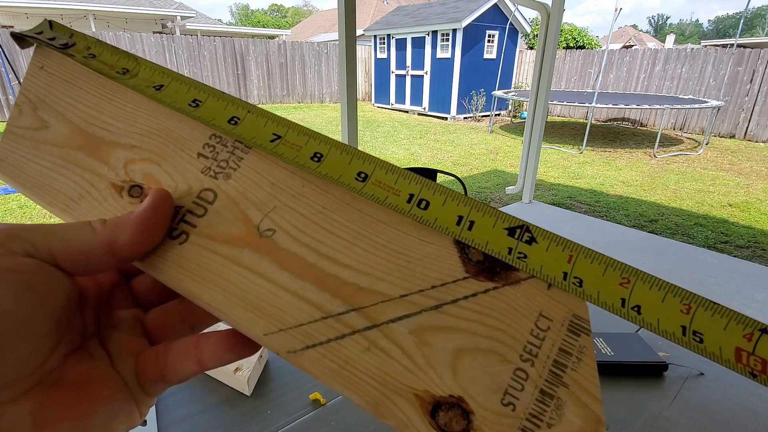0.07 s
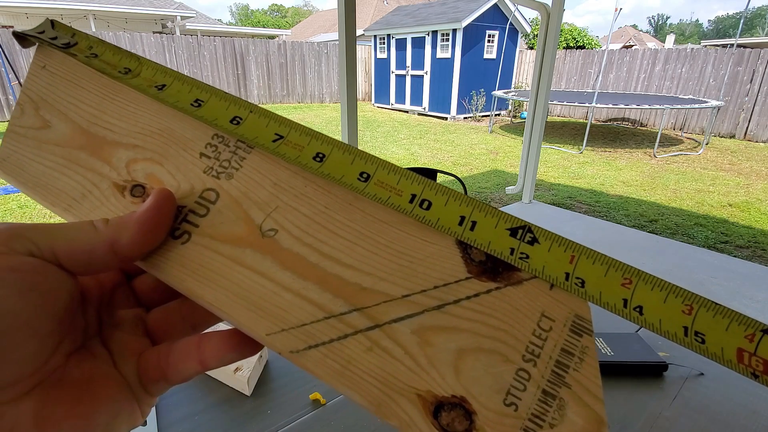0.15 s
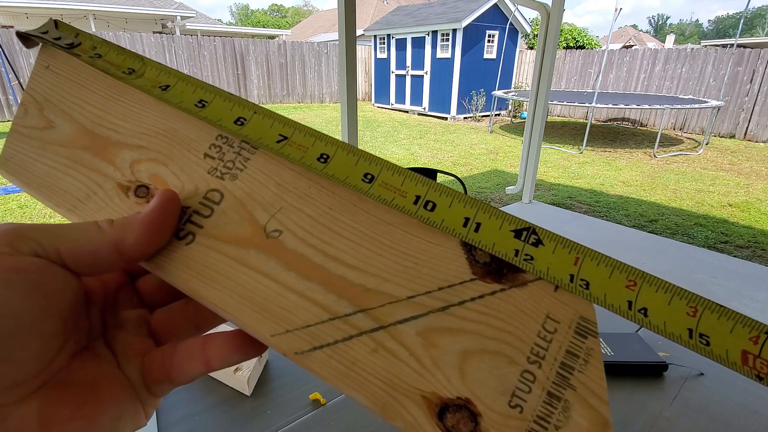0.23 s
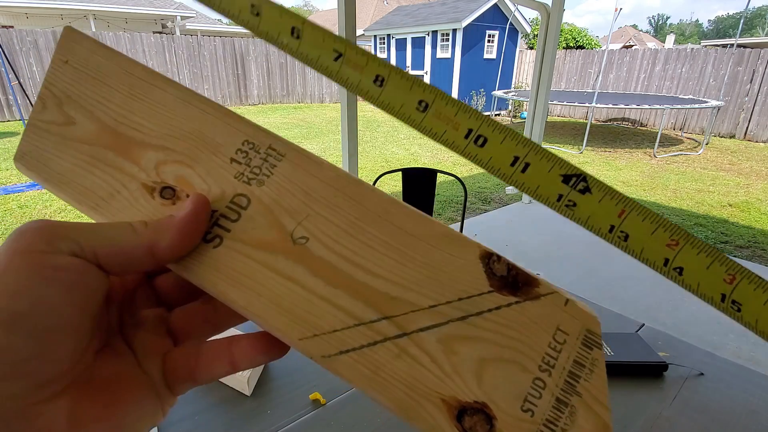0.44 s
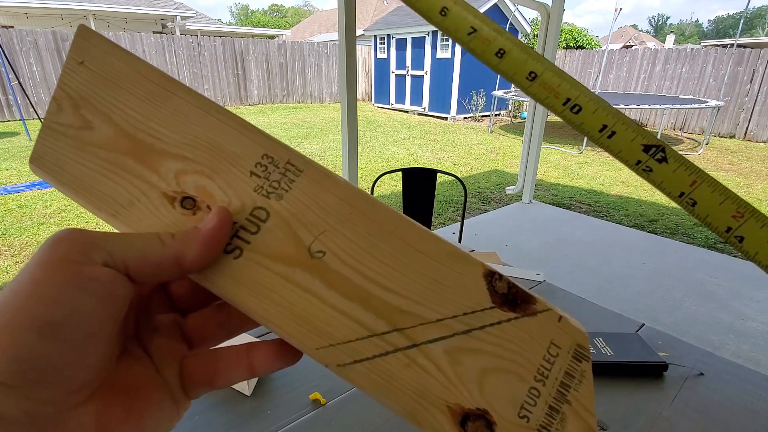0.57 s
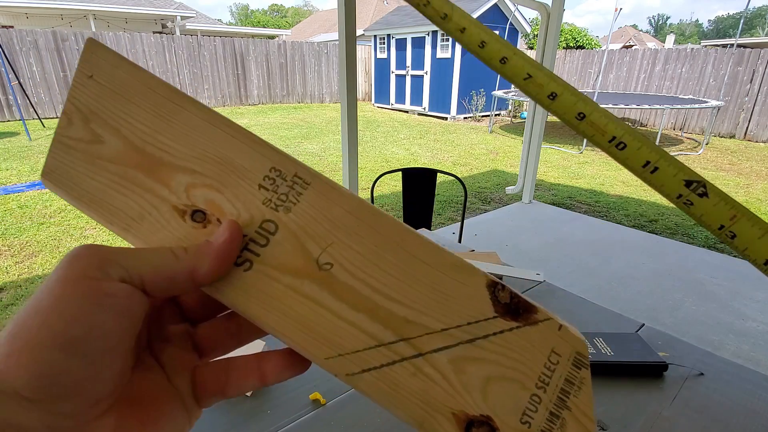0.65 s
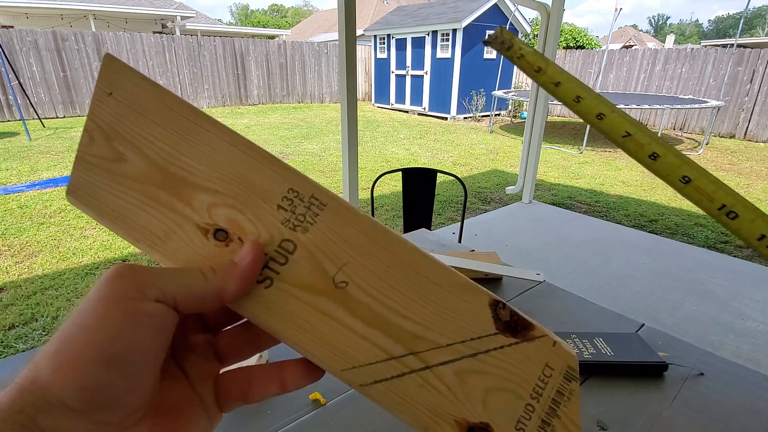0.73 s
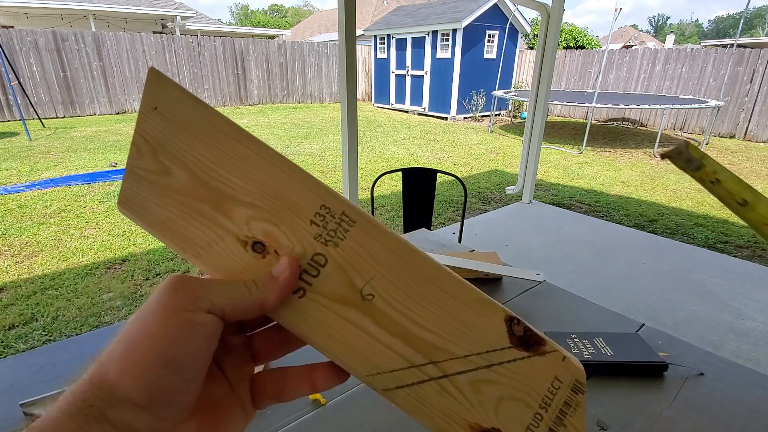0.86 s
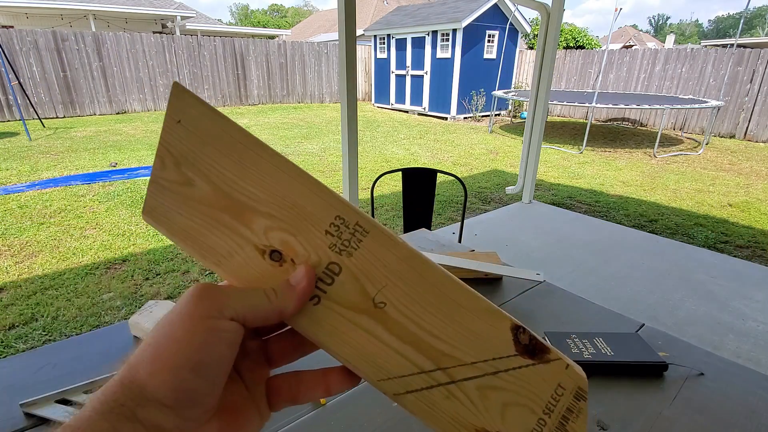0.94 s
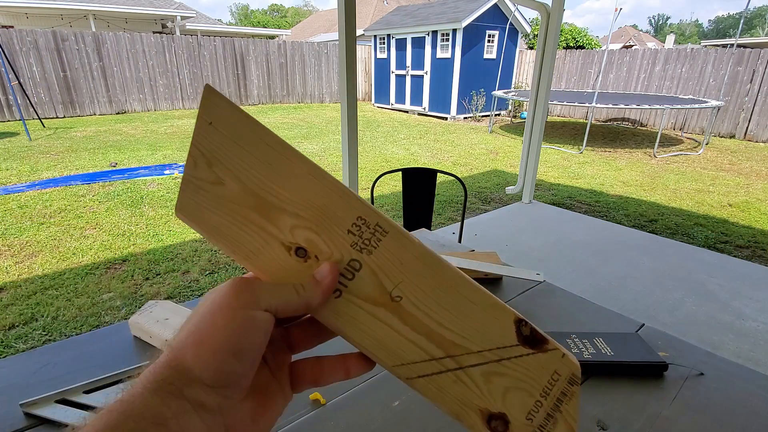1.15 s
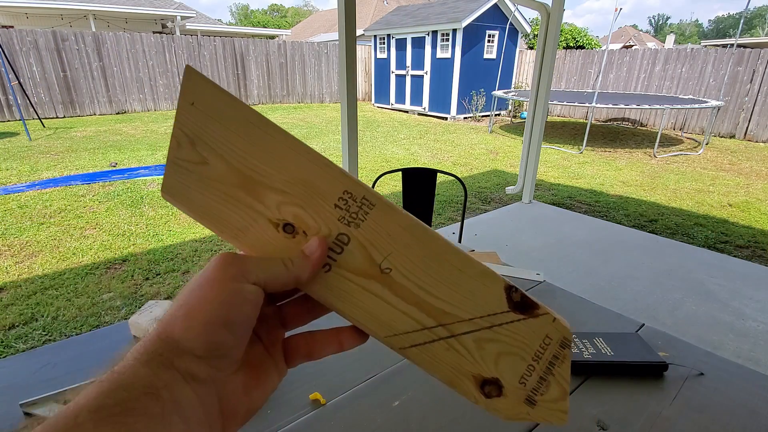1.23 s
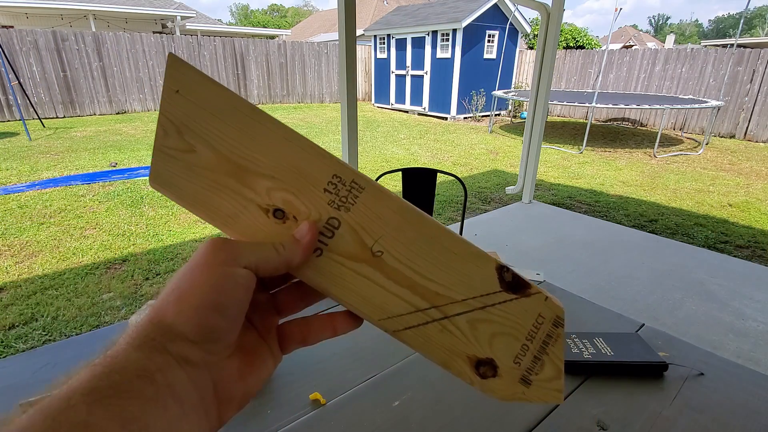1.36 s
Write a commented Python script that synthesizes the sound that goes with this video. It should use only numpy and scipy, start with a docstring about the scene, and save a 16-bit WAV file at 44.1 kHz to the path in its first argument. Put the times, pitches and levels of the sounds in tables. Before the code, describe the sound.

Retracting metal tape blade clicks, hisses faster, and snaps hard into its plastic case outdoors

```python
"""Retracting steel tape measure

A steel tape is unhooked from a board and runs back into its plastic case, close by on a roofed patio.
Friction noise and a case resonance make the blade's hiss; noise bursts through blade resonances tick.
Bursts through case resonances give the spool's knocks and the hook's slam, with a thud and a crack.
Decaying noise forms the brief patio echo; shaped noise forms the outdoor rumble and faint hiss.
A swept tone makes one far bird chirp near the start."""
import sys
import numpy as np
from scipy import signal
from scipy.fft import rfft, irfft, next_fast_len
from scipy.io import wavfile
from scipy.ndimage import uniform_filter1d, map_coordinates

SR = 44100
rng = np.random.default_rng(int(sys.argv[2]) if len(sys.argv) > 2 else 0)


def log_audio(samples):
    """Write samples as a 16-bit WAV file to the path given in sys.argv[1]."""
    # one column per channel
    frames = np.atleast_2d(samples).T
    # limit to full scale, then quantise
    limited = np.clip(frames, -1, 1)
    pcm = np.round(limited * 32767).astype(np.int16)
    wavfile.write(sys.argv[1], SR, pcm)


N = 61739

# Outdoor rumble over time [t/s, level/dB]
RUMBLE_LEVELS = [(0, -39.5), (.12, -34), (.21, -36), (.31, -31.5), (.45, -29.5), (.6, -31.5), (.78, -32),
                 (1.09, -32.5), (1.14, -42), (1.2, -36), (1.24, -38), (1.3, -42.5), (1.4, -45.5)]
# Relative rumble spectrum [f/Hz, level/dB]
RUMBLE_SPECTRUM = [(20, -42), (33, -8), (48, -2), (65, -1), (120, -5), (200, -14), (260, -11), (400, -18),
                   (630, -29), (1200, -59.5), ]
# Left-right correlation of the rumble [f/Hz, correlation/1]
RUMBLE_CORRELATION = [(40, 0.99), (130, 0.97), (290, 0.94), (800, .2)]
# Relative spectrum of the faint steady hiss [f/Hz, level/dB]
AIR_SPECTRUM = [(600, -4.5), (900, -5), (1800, -6.5), (2600, -10), (3800, -18), (8000, -22), (9500, -48),
                (11000, -28.5), (15700, -29)]
# Blade sliding through the mouth [t/s, level/dB, left-right difference/dB, resonance over hiss/dB]
SLIDE_MOTION = [(.33, -89, 8, -26), (.39, -45, 3, -20), (.425, -45, 4.5, -20), (.5, -52, -3.5, -26),
                (.6, -40, -1, -14), (.69, -40, -0.5, -10.5), (.72, -35.5, -4, -12.5),
                (.79, -32.5, -5.5, -12), (.84, -28, -8.5, -11.5), (1.0, -29.5, -8, -9.5),
                (1.11, -27, -8, -9.5), (1.142, -25, -2.5, -15), (1.165, -27, 1, -20), (1.176, -30, -6, -13),
                (1.197, -29.5, -2, -13), (1.205, -57, 2, -20)]
# Relative spectrum of the sliding hiss [f/Hz, level/dB]
HISS_SPECTRUM = [(290, -52), (500, -20), (771, -10.5), (1210, -17), (1970, -10.5), (3600, -11.5),
                 (7310, -5.5), (9340, -10.5), (11300, -4.5), (15700, -6.5)]
# Pitch of the case resonance [t/s, f/Hz]
MOUTH_PITCH = [(.93, 1850), (1.03, 2000), (1.12, 2248)]
# Delay of the left port behind the right [t/s, lag/ms]
LEFT_LAG = [(.4, -0.41), (.56, 0), (.72, 0.484)]
# Blows on the case [t/s, peak level of each path/dB, left-right difference/dB, colour centre f/Hz,
#                    colour width/Hz, decay constant of the burst/s]
CASE_BLOWS = [(.4327, -14.5, -0.5, 1760, 1400, 0.0053), (0.4336, -23.5, 3.5, 1045, 202, 0.0018),
              (0.733, -30.5, -10, 453, 600, 0.0066), (0.7948, -16.5, -4.5, 1852, 300, 0.0028),
              (0.7949, -26, -14, 5030, 1200, 0.0004), (0.911, -22.5, -3, 1740, 900, 0.0043),
              (0.919, -22.5, -11, 1985, 500, 0.0025), (.983, -19.5, -7, 1910, 450, 0.0025),
              (.984, -33, -8, 838, 300, 0.0011), (1.1992, -3.5, 7, 3020, 1200, 0.0016),
              (1.2044, 1, -4, 3720, 7200, 0.0038), (1.208, -11.5, 4, 2240, 1300, 0.014)]
# Case resonances [f/Hz, width/Hz, level/dB]
CASE_MODES = [(398, 196, 6), (786, 120, 2), (1032, 88, -4), (1370, 276, -4.5), (1894, 250, -2),
              (2188, 285, -4), (3070, 1020, -5), (4510, 410, -2), (5760, 420, -3), (6910, 540, 1.5),
              (7430, 3100, -7)]
# Blade against mouth and board [t/s, peak level of each path/dB, t60 of the burst/s, colour centre f/Hz]
BLADE_TICKS = [(0.4346, -12.5, 0.023, 7400), (0.4364, -10, 0.031, 11300), (0.4439, -13, 0.032, 7000),
               (0.4526, -19, 0.022, 7900), (0.4695, -35, 0.015, 8500), (0.4849, -21, 0.023, 12400),
               (0.5652, -17, 0.039, 7000), (.592, -29.5, 0.028, 8400), (0.6437, -36, 0.046, 13000),
               (1.1133, -14, 0.037, 9100), (1.1206, -7, 0.057, 7100), (1.147, -7.5, 0.032, 5330)]
# Blade resonances [f/Hz, width/Hz, level/dB]
BLADE_MODES = [(1745, 540, 0.5), (4190, 1500, -4), (7060, 610, -1), (7850, 450, -0.5), (11160, 3700, -4),
               (15300, 2600, -8.5)]
# Reverberation time of roof and slab [f/Hz, t60/s]
PATIO_T60 = [(700, 0.35), (2500, 0.41), (6000, 0.28), (14000, 0.26)]

RUMBLE_LEAD_MS, AIR_DB = 0.28, -53.5  # the rumble reaches the left port first
CHIRP_S, CHIRP_LENGTH_S, CHIRP_DB = 0.08, 0.033, -58.5
CHIRP_HZ, CHIRP_FALL_HZ = 2570, 97.3  # centre pitch; fall in each CHIRP_LENGTH_S
GRIT_DB, PATCHY_DB = 2, 1.5  # fast unevenness of the scrape; its patchy colour
MOUTH_WIDTH_HZ = 780
MOUTH_PAN = 0.067  # share of the hiss's left-right swing
SHARED_POWER = 0.25  # power share of the path common to both ports
THUD_HZ, THUD_DB, THUD_DECAY_S = 473, -20.5, 0.0038
CRACK_DB, CRACK_DECAY_S = -6, 0.0035
PATIO_DB, PATIO_DELAY_S = -12.5, 0.006
CLIP_TOP, CLIP_HARD = 0.74, 6  # ceiling in full scale; sharpness of the knee
EDGE_HZ, EDGE_DB, TOP_HZ = 15750, -32, 16950  # weak band from edge to top


def amp(db):
    """A level in decibels defines an amplitude ratio."""
    return 10 ** (np.asarray(db) / 20)


def unit(x):
    """Division by the root mean square leaves unit rms."""
    return x / np.sqrt(np.mean(x ** 2) + 1e-20)


def along(points, hz):
    """A spectrum is interpolated on a logarithmic frequency axis."""
    f, value = np.transpose(points)
    return np.interp(np.log(hz + 1), np.log(f + 1), value)


def curves(rows):
    """Linear interpolation gives each column after the time one value per sample."""
    s, *columns = np.transpose(rows)
    return [np.interp(np.arange(N) / SR, s, column) for column in columns]


def wobble(rate):
    """Spline interpolation of random knots, rate per second, gives a smooth fluctuation."""
    knots = rng.standard_normal(int(N * rate / SR) + 4)
    return map_coordinates(knots, [np.arange(N) * rate / SR])


def filtered(x, response):
    """A linear filter multiplies the spectrum by its frequency response."""
    n = x.shape[-1]
    padded = next_fast_len(n + 4096)
    spectrum = rfft(x, padded) * response(np.fft.rfftfreq(padded, 1 / SR))
    return irfft(spectrum, padded)[..., :n]


def ringing(modes):
    """Modal superposition: a body responds as a sum of damped resonances, here of alternating sign."""
    def response(f):
        total = 0
        for k, (centre, width, db) in enumerate(modes):
            damping = 1j * f * width
            total = total + (-1) ** k * amp(db) * damping / (centre * centre - f * f + damping)
        return total
    return response


def rush(spectrum, correlation):
    """Independent mid and side noises set the interaural correlation by their power ratio."""
    def mid_side(hz):
        angle = np.arccos(np.clip(along(correlation, hz), -1, 1)) / 2
        return amp(along(spectrum, hz)) * np.array([np.cos(angle), np.sin(angle)])
    mid, side = filtered(rng.standard_normal((2, N)), mid_side)
    return unit(np.array([mid + side, mid - side]))


def panned(pair, pan_db):
    """Intensity panning: the left-right level difference is split evenly between the ports."""
    return pair * amp(np.array([pan_db, -pan_db]) / 2)


def blended(shared, own):
    """Incoherent addition: power shares weight the common path and each port's own path."""
    return np.sqrt(SHARED_POWER) * shared + np.sqrt(1 - SHARED_POWER) * own


def heard(trio):
    """Time-of-arrival difference: the shared path reaches the nearer port first."""
    half_lag = curves(LEFT_LAG)[0] * SR / 2000  # ms to half the lag in samples
    n = np.arange(N)
    shared = [map_coordinates(trio[0], [n + side * half_lag]) for side in (-1, 1)]
    return blended(np.array(shared), trio[1:])


def one(s, burst, db, pan_db):
    """Time-of-arrival difference for a single impact, with its lag fixed at the moment of the hit."""
    trio = np.zeros((3, N))
    at = round(s * SR)
    peak = np.abs(burst).max(1, keepdims=True)
    trio[:, at:at + burst.shape[1]] = amp(db) * burst / peak
    half_lag = np.interp(s, *np.transpose(LEFT_LAG)) * SR / 2000
    shared = [np.roll(trio[0], round(side * half_lag)) for side in (1, -1)]
    return panned(blended(np.array(shared), trio[1:]), np.array([pan_db]))


def rumble():
    """Band-shaped random noise with a fluctuating level forms a lumpy far rumble, left first."""
    level_db = curves(RUMBLE_LEVELS)[0] + 1.98 * wobble(15.66)
    pair = amp(level_db) * rush(RUMBLE_SPECTRUM, RUMBLE_CORRELATION)
    pair[1] = np.roll(pair[1], round(RUMBLE_LEAD_MS * SR / 1000))
    return pair


def air():
    """Stationary noise, nearly uncorrelated between the ports, forms the faint hiss."""
    return amp(AIR_DB) * rush(AIR_SPECTRUM, [(1000, 0.061), (8000, 0.05)])


def chirp():
    """Frequency modulation: a bird's tone falls in pitch under a Gaussian envelope."""
    u = (np.arange(N) / SR - CHIRP_S) / CHIRP_LENGTH_S
    phase = 2 * np.pi * np.cumsum(CHIRP_HZ - CHIRP_FALL_HZ * u) / SR
    return amp(CHIRP_DB) * np.exp(-u ** 2) * np.sin(phase)


def patchy(x):
    """Short-time spectral gain: random patches of time and frequency shift the scrape's colour."""
    z = signal.stft(x, nperseg=256)[2]
    field = rng.standard_normal(z.shape[1:])
    field = uniform_filter1d(field, size=8, axis=0)
    field = uniform_filter1d(field, size=6, axis=1)
    return signal.istft(z * amp(PATCHY_DB * unit(field)), nperseg=256)[1][:, :N]


def mouth_resonance(excess_db):
    """Amplitude modulation of a carrier by slow noise gives a resonance that climbs as the spool fills."""
    noise = rng.standard_normal((2, 3, N))
    slow = unit(filtered(noise, lambda hz: 1 / (1 + (2 * hz / MOUTH_WIDTH_HZ) ** 2)))
    phase = 2 * np.pi * np.cumsum(curves(MOUTH_PITCH)[0]) / SR
    carrier = slow[0] * np.cos(phase) + slow[1] * np.sin(phase)
    return carrier * amp(excess_db + 1.9 * wobble(51.4))


def slide():
    """Friction: the gritty blade radiates broadband noise and excites the case resonance."""
    level_db, pan_db, mouth_db = curves(SLIDE_MOTION)
    grit = amp(GRIT_DB * wobble(400) + 1.2 * wobble(40)) * rng.standard_normal((3, N))
    hiss = unit(filtered(patchy(grit), lambda hz: amp(along(HISS_SPECTRUM, hz))))
    mouth = mouth_resonance(mouth_db)
    return amp(level_db) * (panned(heard(hiss), pan_db) + panned(heard(mouth), MOUTH_PAN * pan_db))


def blows():
    """Impact excitation: short coloured pushes set the modes of the case ringing."""
    t = np.arange(SR // 12) / SR
    out = np.zeros((2, N))
    for s, db, pan_db, hz, width_hz, decay_s in CASE_BLOWS:
        push = np.exp(-t / decay_s) * rng.standard_normal((3, len(t)))
        push[:, 0] = 5  # sharp first contact
        colour, case = ringing([(hz, width_hz, 0)]), ringing(CASE_MODES)
        out += one(s, filtered(push, lambda f: colour(f) ** 2 * case(f)), db, pan_db)
    return out


def slam():
    """Impact of the hook: the whole case jumps as a damped sine and the blade rattles in its modes."""
    t = np.arange(SR // 12) / SR
    out = np.zeros((2, N))
    for s, *_ in CASE_BLOWS[-3:-1]:
        at = round(s * SR)
        thud = amp(THUD_DB) * np.exp(-t / THUD_DECAY_S) * np.sin(2 * np.pi * THUD_HZ * t)
        out[:, at:at + len(t)] += thud
        rattle = np.exp(-t / CRACK_DECAY_S) * rng.standard_normal((3, len(t)))
        out += one(s, filtered(rattle, ringing(BLADE_MODES)), CRACK_DB, 0)
    return out


def ticks():
    """Impact excitation: dying noise bursts ring the blade's modes, panned to where the blade slides."""
    t = np.arange(SR // 12) / SR
    pan_db = curves(SLIDE_MOTION)[1]
    out = np.zeros((2, N))
    for s, db, t60, hz in BLADE_TICKS:
        burst = amp(-60 * t / t60) * rng.standard_normal((3, len(t)))
        burst[:, 0] = 4  # sharp first contact
        colour, blade = ringing([(hz, 1.8 * hz, 0)]), ringing(BLADE_MODES)
        out += one(s, filtered(burst, lambda f: colour(f) * blade(f)), db, pan_db[round(s * SR)])
    return out


def patio(x):
    """Reverberation: roof and slab return a tail in which each frequency decays at its own rate."""
    hz, t, z = signal.stft(rng.standard_normal((2, SR // 2)), SR, nperseg=256)
    decay = amp(-60 * t / along(PATIO_T60, hz)[:, None])
    tail = signal.istft(z * decay, SR, nperseg=256)[1]
    late = np.pad(x, ((0, 0), (round(PATIO_DELAY_S * SR), 0)))
    return signal.fftconvolve(late, tail / np.linalg.norm(tail[0]), axes=1)[:, :N]


def scene():
    """Superposition: outdoor sound, tape sound and its reverberation add linearly."""
    outdoors = rumble() + air() + chirp()
    tape = slide() + blows() + slam() + ticks()
    return outdoors + tape + amp(PATIO_DB) * patio(tape)


def record(dry):
    """Saturation and band limiting: peaks round off, the top of the band is weak, nothing lies above."""
    soft = dry / (1 + np.abs(dry / CLIP_TOP) ** CLIP_HARD) ** (1 / CLIP_HARD)
    return filtered(soft, lambda hz: np.where(hz < EDGE_HZ, 1, amp(EDGE_DB)) * (hz < TOP_HZ))


dry = scene()
out = record(dry)
log_audio(out)
```